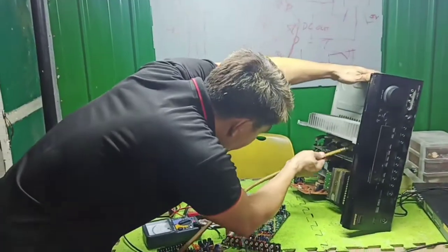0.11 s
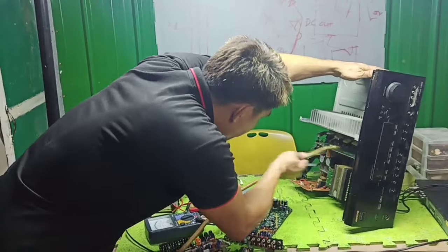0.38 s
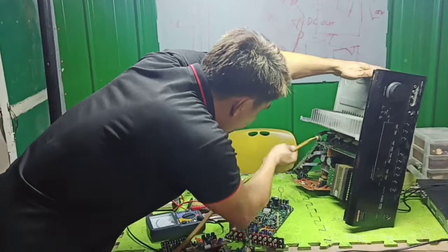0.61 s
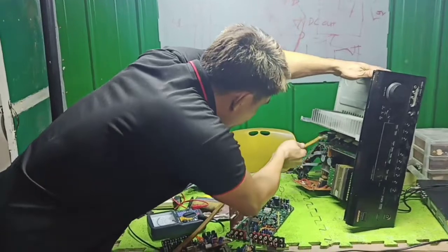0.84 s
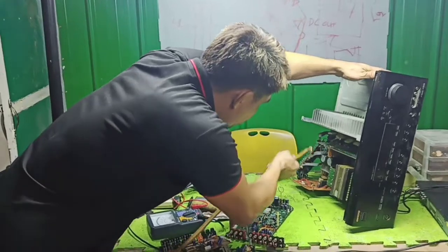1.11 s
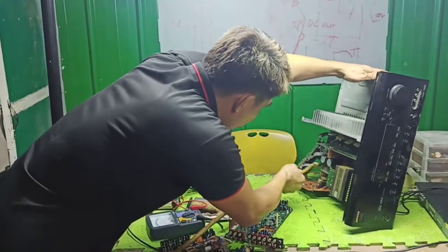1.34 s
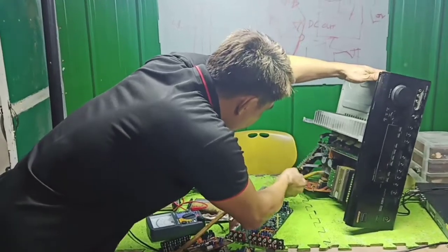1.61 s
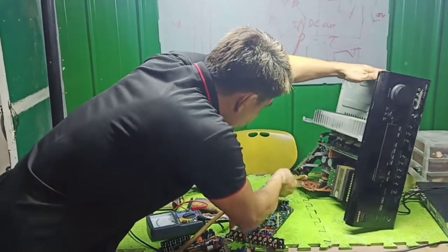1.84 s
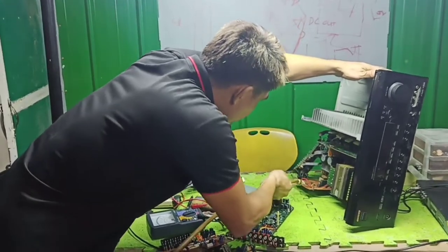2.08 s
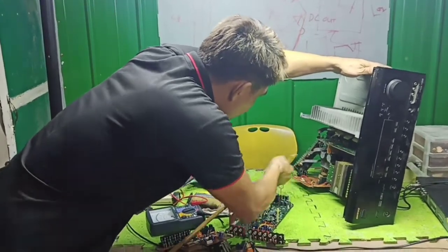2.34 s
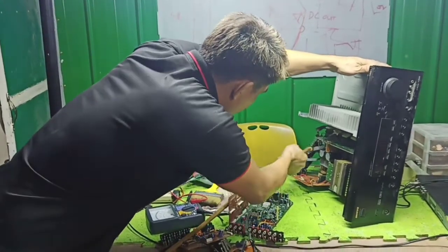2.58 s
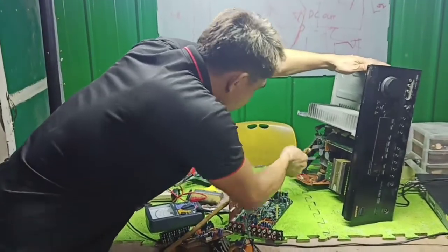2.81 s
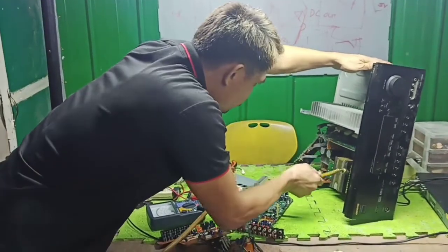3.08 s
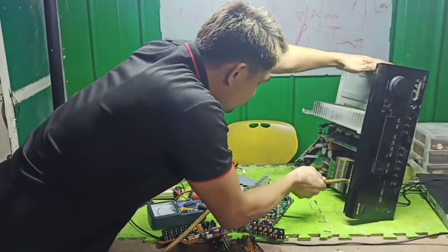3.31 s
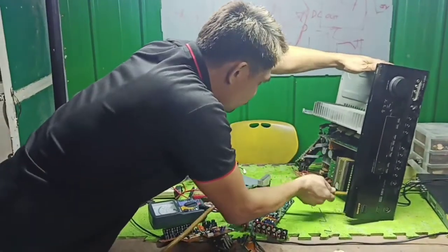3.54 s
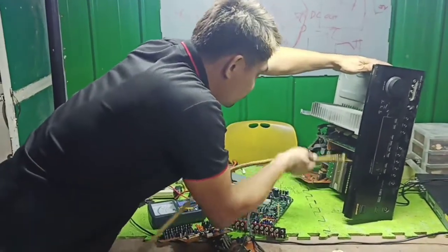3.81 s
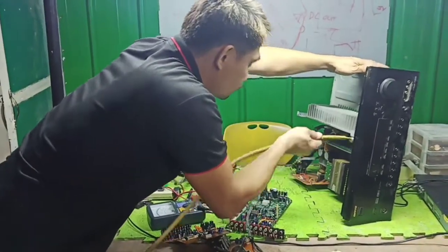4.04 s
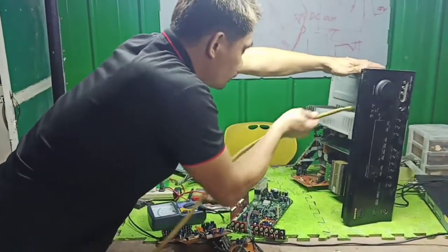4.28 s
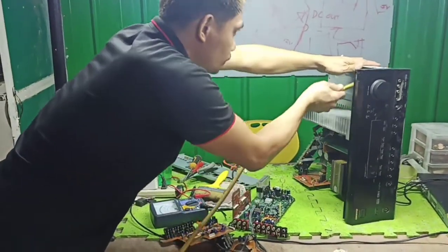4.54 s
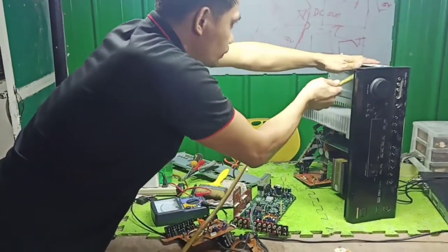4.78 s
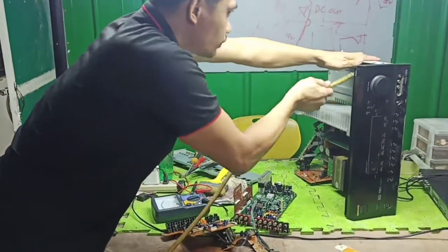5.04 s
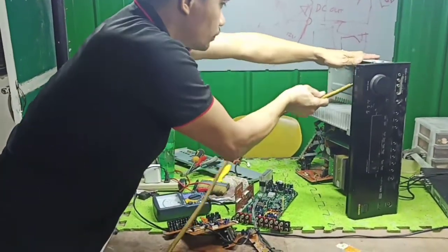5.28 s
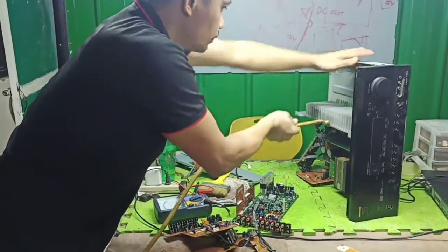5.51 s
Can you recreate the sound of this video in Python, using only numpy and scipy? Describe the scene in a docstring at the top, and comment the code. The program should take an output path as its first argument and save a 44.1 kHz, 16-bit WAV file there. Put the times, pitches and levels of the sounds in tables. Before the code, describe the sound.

Loud, treble-heavy air noise runs throughout, swept by hand over boards and fins. Fast swells and dips roughen it, with breathy whistles and hollow puffs; it weakens near three and a half seconds, returns strongly around four, and ends fuller. Close, centred sound, small reflective room, microphone buffeted into a low throb.

```python
"""Compressed air hisses from a hose nozzle that a hand sweeps over circuit boards and fins in a small workshop.
The hiss is shaped noise in seven parts: it swells or dips at edges and roars lower where it fills a hollow.
Gliding bands of noise whistle in gaps and gust into hollows; three shifting noise tails make the echoes.
It is loud enough to bend the small microphone, whose uneven swing adds a rumble that throbs with the hiss."""
import sys
import numpy as np
from scipy import signal
from scipy.io import wavfile
from scipy.ndimage import uniform_filter1d

SR = 44100
rng = np.random.default_rng(int(sys.argv[2]) if len(sys.argv) > 2 else 0)


def unload_wav(signal):
    """Save mono or channel-first audio to the path in sys.argv[1] as 16-bit WAV at rate SR, clipped to [-1, 1]."""
    wavfile.write(
        sys.argv[1],
        SR,
        np.round(np.clip(np.atleast_2d(signal).T, -1, 1) * 32767).astype(np.int16),
    )


def ratio_of_db(decibels):
    """Turn decibels (scalar or array-like) into linear amplitude factors; 0 dB maps to 1."""
    return 10 ** (np.asarray(decibels, float) / 20)


N = 248718  # samples
HOP, FRAME = 64, 256  # samples, short-time spectra


def evened(x):
    """Scale to rms 1."""
    return x / np.sqrt(np.mean(x ** 2) + 1e-20)


def read(points, hz):
    """Interpolate a curve on log frequency; -120 outside its ends."""
    point_hz, value = np.transpose(points)
    return np.interp(np.log(hz + 1), np.log(point_hz + 1), value, left=-120, right=-120)


def blurred(shape, sizes):
    """Smooth chance of rms 1, blurred twice along each axis."""
    x = rng.standard_normal(shape)
    for axis, size in enumerate(sizes):
        for _ in range(2):
            x = uniform_filter1d(x, size, axis)
    return evened(x)


def swell(t, at_s, length_s):
    """A flat-topped bump centred on the moment."""
    return np.exp(-.5 * (2 * (t - at_s) / length_s) ** 4)


def jet(patchy_db=1.74, flicker_db=0.86, throb_db=.5):
    """Turbulent noise: spectrum driven by the hand; patches and flutter (rms dB) roughen the level."""
    frames, hz = N // HOP + 5, np.fft.rfftfreq(FRAME, 1 / SR)
    power = jet_power(hz, hand_levels(np.arange(frames) * HOP / SR))
    patches = blurred((frames, len(hz)), sizes=(24, 2)).T
    flicker = flicker_db * blurred((frames, 1), sizes=(2,)).T
    throb = throb_db * blurred((frames, 1), sizes=(12,)).T
    bright = np.clip(hz / 9000, 0, 1.6)[:, None]  # the treble flutters most
    rough_db = patchy_db * patches + bright * (flicker + throb)
    noise = (rng.standard_normal((frames, len(hz), 2)) @ [1, 1j]).T
    z = noise * np.sqrt(power) * ratio_of_db(rough_db)
    hiss = signal.istft(z, nperseg=FRAME, noverlap=FRAME - HOP)[1][:N]
    return ratio_of_db(-4.5) * 2 * hiss


def hand_levels(t):
    """Level of each part (dB before the jet's output gain): path, crossings and hollows move it from rest."""
    # hand's path: time_s, nearness_db (nozzle to parts), reach_db (into casing), slant_db (across sharp edges)
    sweep = [(0.0, 0.5, 2, -2.5), (.35, 1, 4, -0.5), (.52, -2, 1.5, -1), (.66, 0.5, -6.5, 1),
             (.85, -2, 1, 0.5), (1.03, -2, 1, 0), (1.17, -3, -1.5, -1.5), (1.37, -2, -0.5, -1),
             (1.48, -2, 4.5, -0.5), (1.74, 2, 3.5, 4), (1.83, -6.5, -1, -8), (1.99, -3.5, -3.5, -1.5),
             (2.2, -4, -1.5, 0), (2.32, -4.5, -6.5, -2.5), (2.5, -3, -3.5, 0.5), (2.68, -2.5, -3.5, -4),
             (2.9, -2, -1, -1), (3.13, -4.5, -3, -0.5), (3.3, -1, -3, 0.5), (3.46, -6, -5.5, -5.5),
             (3.57, -8.5, -5, -9.5), (3.7, -3.5, 0.5, -5), (3.95, 2.5, 1.5, 2), (4.2, 1, 2.5, -1.5),
             (4.33, 0.5, 0, 0), (4.45, -5, -2, -2.5), (4.6, -3, -3.5, -9.5), (4.95, 2, 1.5, -3.5),
             (5.18, 6, -2.5, -7), (5.23, 5, 4, -2), (5.33, 3, 9.5, -3), (5.45, 5.5, 6.5, -2),
             (5.64, 5, 2.5, -1.5)]
    # jet flicks across an edge (swell) or into open air (dip):
    # centre_s, length_s, rise_db, shrillness (-1 dull to 1 shrill)
    crossings = [(0.027, 0.025, 3.5, -0.38), (0.084, 0.045, 1.5, .2), (.225, 0.06, 5, 1),
                 (0.3, 0.038, -2, -0.15), (0.4, 0.12, 1, 0.088), (.5, 0.067, -2.5, .3),
                 (0.585, 0.04, 1.5, 0.45), (.79, 0.046, 1, .6), (0.94, 0.065, 0, 0.43),
                 (1.09, .05, -0.5, .6), (1.207, 0.017, 3.5, -.2), (1.33, 0.04, 4.5, -0.22),
                 (1.37, 0.023, -1, 0), (1.42, 0.063, 7.5, 0.035), (1.5, .04, 0.5, -.3),
                 (1.586, 0.087, 3.5, 0.24), (1.76, 0.032, 6.5, 0.6), (1.86, .05, 1.5, .6),
                 (1.914, 0.065, 3, 0.14), (1.99, 0.044, -1, -0.079), (2.041, 0.065, 4, 0.56),
                 (2.252, 0.054, 0.5, 0.67), (2.303, 0.052, -1.5, 0), (2.351, .02, 3, 0.67),
                 (2.375, 0.061, 2, 0.48), (2.5, 0.048, 1, .5), (2.608, .025, 6, -0.088),
                 (2.743, 0.058, 6, 0.14), (2.82, .04, -1.5, .2), (2.87, 0.047, 3.5, 0.59),
                 (2.913, .04, 1, -0.37), (3.047, .03, -2, 0), (3.08, 0.036, 4.5, -0.07), (3.191, .03, 4, 1),
                 (3.212, 0.063, 6, -0.65), (3.379, 0.067, 5.5, -0.21), (3.797, .04, -1, -.5),
                 (3.845, 0.032, 2, .2), (3.93, 0.032, -1, 0.067), (4.03, .03, -2, .2),
                 (4.062, 0.026, 6, 0.12), (4.121, 0.078, 5, -0.15), (4.283, 0.06, 2.5, -0.56),
                 (4.43, 0.028, -1.5, 0), (4.47, .04, 3, 0.48), (4.71, 0.039, -1, 0.54),
                 (4.812, 0.014, 3.5, 0.088), (4.917, .03, 2, 0), (5.146, 0.019, 2, -.2),
                 (5.404, .09, 1.5, 0), (5.49, 0.05, -1.5, -.3), (5.54, 0.037, 3, -0.047),
                 (5.614, 0.022, 1.5, .2)]
    # how squarely the jet blows over the mouth of a hollow: time_s, over_db
    over_hollow = [(0.0, -0.5), (.5, 0.5), (.66, 1), (1.3, 2.5), (1.95, 1.5), (2.1, 0.5), (2.45, -2),
                   (2.8, -7), (3.05, -1.5), (3.15, -3), (3.45, -6), (3.6, 0), (4.0, -0.5), (4.5, 1),
                   (4.7, 2.5), (5.15, -1), (5.3, -2), (5.64, 3.5)]
    # share of over_db taken by each part, in the order of the rows of parts
    hollow_shares = [0.06, 0, 0, 0, 0, 0.57, 0.2]
    # rows core, fizz, wash, sheen, gaps, hollows, rush:
    # rest_db, shares of nearness, reach, slant, crossing rise, rise times shrillness
    parts = [(-24, 0.83, 0.01, -0.2, 1, -0.85), (-23.5, 0.01, 0.01, 0.67, 1.08, 0.083),
             (-28, 0.64, 0.01, 0.01, 0.54, -0.43), (-31.5, 0.46, 0.27, 0.087, 0.96, 0.47),
             (-38.5, 0.093, 1.2, -0.26, 0.56, -0.52), (-42.5, 0.074, 0.93, -0.46, 0.21, -0.9),
             (-50, 0.3, 0.4, -0.66, -.3, -0.89)]
    path_s, *path = np.transpose(sweep)
    rises = np.array([db * swell(t, at, length) for at, length, db, _ in crossings])
    shrillness = np.transpose(crossings)[-1]
    moves = [np.interp(t, path_s, column) for column in path]
    controls = [np.ones(len(t)), *moves, rises.sum(0), shrillness @ rises]
    over_db = np.interp(t, *np.transpose(over_hollow))
    return np.array(parts) @ controls + np.outer(hollow_shares, over_db)


def jet_power(hz, levels_db):
    """Sum of the parts' power spectra, each scaled so that its level counts in its own band."""
    # colours of the parts of the hiss, treble and bass mixed: hz, density_db (relative, per Hz)
    core = [(6500, -46), (7300, 1), (8160, 10), (8900, 5), (9800, -4.5)]
    fizz = [(12000, -19), (13500, -2), (15100, 8), (17000, -6.5), (19500, 4.5), (21500, -29)]
    wash = [(4000, -14), (5000, -1), (6200, 9.5), (7150, 10), (7800, 4.5)]
    sheen = [(8800, -22), (9800, 1), (11300, 5), (12250, 3.5), (13200, 4.5), (14000, -13)]
    gaps = [(1800, -18), (2600, 6), (3550, 7), (4600, 7.5), (5400, 9), (6500, -6)]
    hollows = [(950, -23), (1450, 4), (1910, 9), (2400, 3), (3200, -13)]
    rush = [(40, -25), (150, -8), (500, -2.5), (810, 3.5), (1250, 3.5), (1600, -2)]
    # band where each part's level is counted, same order: low_hz, high_hz
    counted = [(7200, 9500), (13000, 15600), (5000, 7200), (9500, 13000), (2500, 4800), (1300, 2500),
               (500, 1300)]
    power = np.zeros((len(hz), levels_db.shape[1]))
    colours = (core, fizz, wash, sheen, gaps, hollows, rush)
    for colour, (low_hz, high_hz), level_db in zip(colours, counted, levels_db):
        shape = ratio_of_db(read(colour, hz)) ** 2
        shape /= shape[(hz > low_hz) & (hz < high_hz)].sum()
        power += shape[:, None] * ratio_of_db(level_db) ** 2
    return power


def whistles():
    """Air singing in narrow gaps: narrow noise bands."""
    # centre_s, pitch_hz, glide_hz_per_s, length_s, level_db
    whistle_rows = [(.23, 8100, 0, .11, -20.5), (.41, 7720, 3000, 0.043, -24), (.78, 7050, 2998, .06, -27),
                    (.92, 7300, 5000, 0.064, -28.5), (1.2, 4100, 0, .018, -33.5),
                    (1.25, 6720, 9000, 0.079, -25), (1.335, 4120, 3000, .03, -35),
                    (2.451, 6020, -2, 0.11, -31), (2.875, 7660, 0, .01, -27), (3.21, 8120, 0, 0.055, -15),
                    (3.37, 5900, -4, 0.14, -34), (5.375, 5700, 0, .025, -24), (5.526, 6770, 0, .022, -23)]
    return gliding_bands(whistle_rows, pole_width=0.066)


def gusts():
    """Air gusting into hollows: broad noise bands."""
    # centre_s, pitch_hz, glide_hz_per_s, length_s, level_db
    gust_rows = [(.13, 1003, 0, .07, -42.5), (.5, 1913, 0, .09, -41.5), (.72, 1803, -3, 0.21, -44),
                 (.8, 1204, -2, .08, -44.5), (1.03, 1800, 0, 0.1, -43), (1.2, 1883, 0, .03, -38),
                 (1.31, 1492, 0, 0.068, -39), (1.58, 1010, 0, 0.054, -49), (1.9, 1910, -2, 0.15, -42),
                 (2.15, 912, 0, 0.051, -50), (2.23, 3030, 0, 0.07, -43), (2.51, 1298, 0, 0.046, -42),
                 (2.565, 909, -2, 0.049, -37.5), (2.57, 1955, 0, 0.052, -33), (2.98, 1200, 0, 0.037, -42),
                 (3.06, 1495, 0, 0.06, -40), (3.39, 1007, 0, .06, -52), (3.53, 900, 0, 0.072, -45),
                 (3.6, 1693, 4998, 0.2, -38.5), (3.83, 1488, 0, 0.061, -38.5), (3.98, 1502, 0, 0.13, -43),
                 (4.078, 1460, -4, 0.016, -31.5), (4.3, 1902, 0, 0.079, -41), (4.58, 1306, -2, 0.038, -45),
                 (4.675, 1200, 5, 0.1, -43), (4.674, 2634, 0, 0.09, -33.5), (5.2, 1280, 0, 0.048, -37),
                 (5.27, 2960, 0, 0.046, -29), (5.38, 2425, 2, 0.13, -35.5), (5.5, 1000, 0, 0.25, -46)]
    return gliding_bands(gust_rows, pole_width=0.78)


def gliding_bands(rows, pole_width):
    """Noise through a double pole (width of each as a share of the centre), shifted to a gliding centre."""
    out, span = np.zeros(N + SR), SR // 2
    t = (np.arange(span) - span // 2) / SR
    for at_s, pitch_hz, glide, length_s, level_db in rows:
        noise = rng.standard_normal((span, 2)) @ [1, 1j]
        r = np.exp(-np.pi * pole_width * pitch_hz / SR)
        slow = signal.lfilter([1], np.poly([r, r]), noise)
        carrier = np.exp(2j * np.pi * (pitch_hz + glide * t / 2) * t)
        tone = evened((slow * carrier).real)
        out[round(at_s * SR):][:span] += ratio_of_db(level_db) * swell(t, 0, length_s) * tone
    return out[span // 2:][:N]


def workshop(x, half_turns_per_s=1.302, first_echo_s=.009):
    """Echoes off walls and casing; the moving nozzle hands its sound from one echo pattern to the next."""
    # decay: hz, t60_s (held within 0.05 to 1 s below)
    room_t60 = [(100, 1), (1000, 0.2), (4000, -0.3), (16000, 2), (22000, 7)]
    # echo level against the direct sound: hz, level_db
    room_db = [(100, -8.5), (1000, -8.5), (4000, -7.5), (8000, -11), (16000, -10), (22000, 8)]
    hz, t, z = signal.stft(rng.standard_normal((3, SR // 2)), SR, nperseg=FRAME)
    t60_s = np.clip(read(room_t60, hz), .05, 1)
    z = z * ratio_of_db(-60 * t / t60_s[:, None])
    z *= (ratio_of_db(read(room_db, hz)) / np.linalg.norm(z, axis=2))[..., None]
    tails = signal.istft(z, SR, nperseg=FRAME)[1] * np.sqrt(3) / FRAME  # energy 1 at 0 dB
    tails = np.pad(tails, ((0, 0), (round(first_echo_s * SR), 0)))
    turn = np.pi * (half_turns_per_s * np.arange(N) / SR + np.arange(3)[:, None] / 3)
    shares = np.sqrt(2 / 3) * np.cos(turn)  # squares sum to one
    return signal.oaconvolve(shares * x, tails, axes=1)[:, :N].sum(0)


def scene():
    """Direct air noise and its echoes, alike in both ears."""
    air = jet() + whistles() + gusts()
    return np.tile(air + workshop(air), (2, 1))


def top_cut(x):
    """Nothing passes above the cut-off."""
    return signal.sosfilt(signal.butter(12, 16860, fs=SR, output="sos"), x)


def record(dry, bend_db=-5, droop_hz=700, favour_hz=6000, low_cut_hz=95, edge_hz=15590):
    """The diaphragm swings unevenly: the square of the hiss adds rumble; then low cut and band limit."""
    treble = signal.lfilter(*signal.butter(1, favour_hz, "high", fs=SR), dry)
    swing = treble ** 2  # the top of the hiss bends it most
    throb = signal.lfilter(*signal.butter(2, droop_hz, fs=SR), swing - np.mean(swing))
    rounded = 1.3 * np.tanh(dry / 1.3)  # the loudest swings round off
    bent = rounded + ratio_of_db(bend_db) * throb
    low_cut = signal.butter(2, low_cut_hz, "high", fs=SR, output="sos")
    cut = signal.sosfilt(low_cut, bent)
    band_limit = signal.firwin(1023, edge_hz, window=("kaiser", 10), fs=SR)
    mix = signal.oaconvolve(cut, band_limit[None], "same", axes=1)
    return top_cut(mix)


dry = scene()
out = record(dry)
unload_wav(out)
```